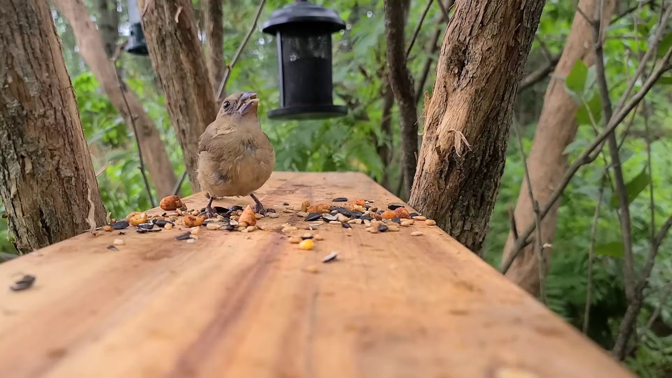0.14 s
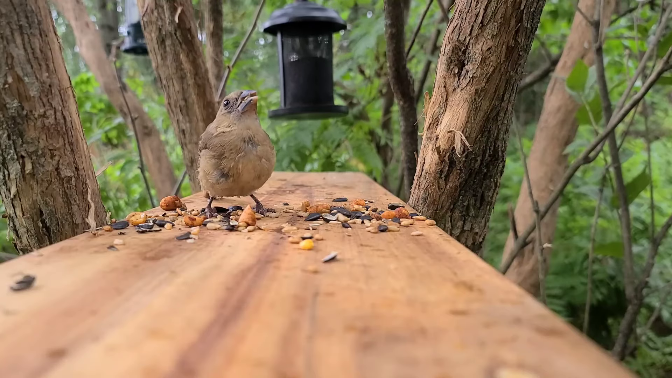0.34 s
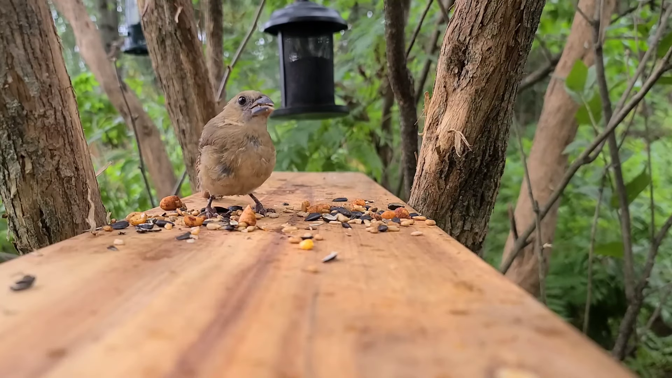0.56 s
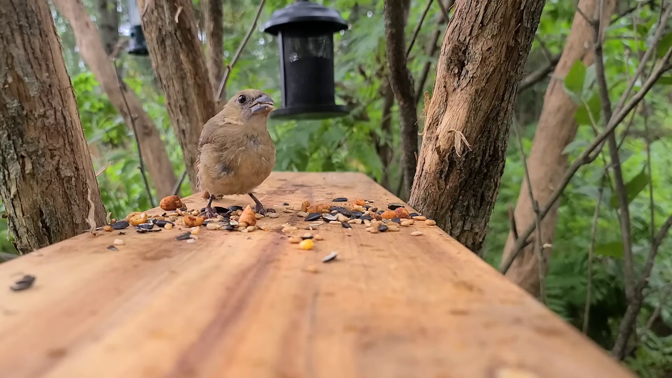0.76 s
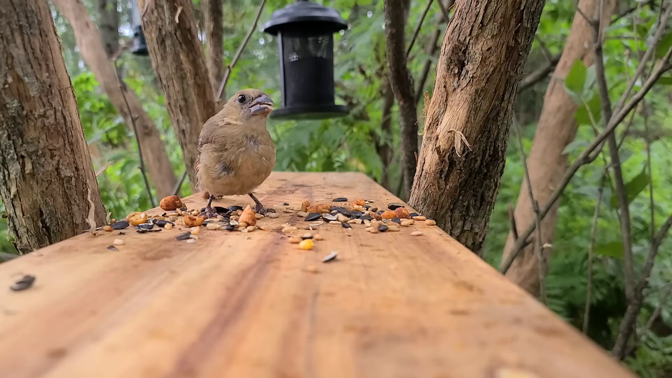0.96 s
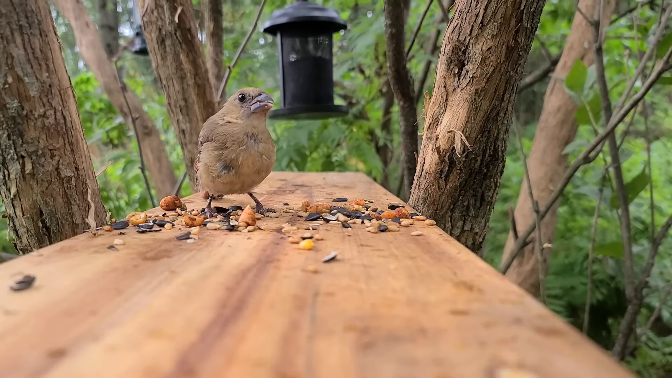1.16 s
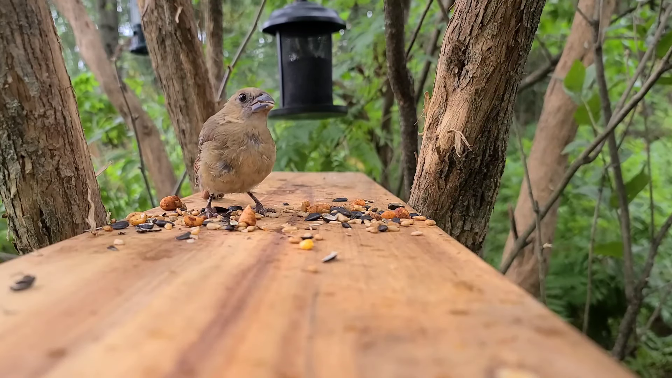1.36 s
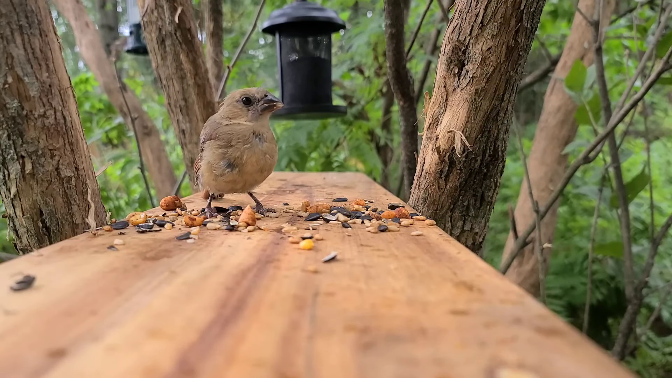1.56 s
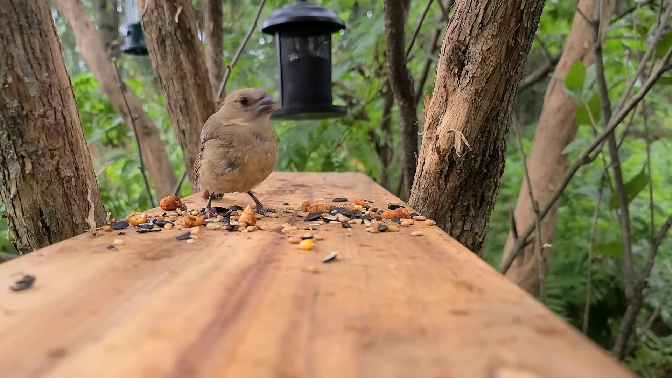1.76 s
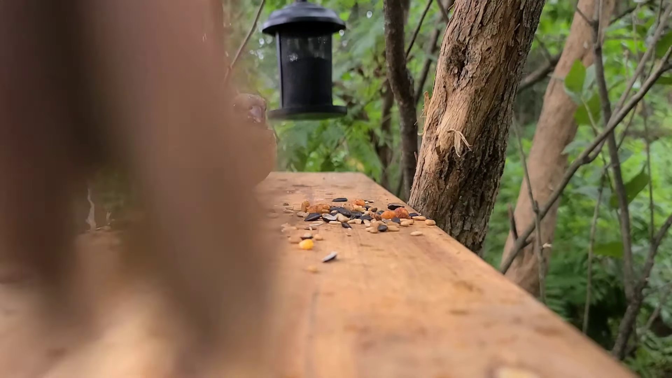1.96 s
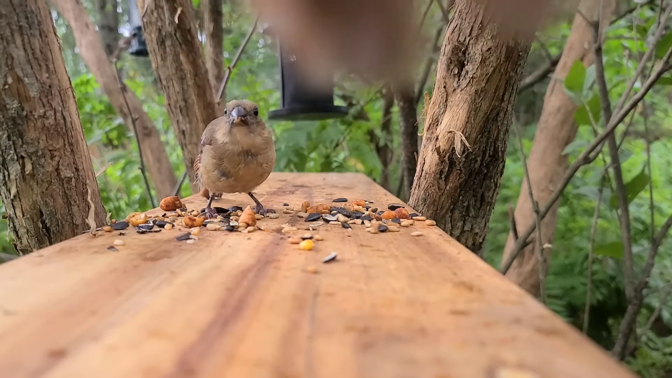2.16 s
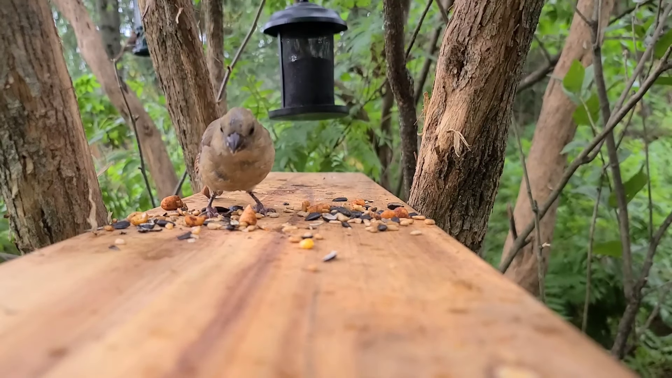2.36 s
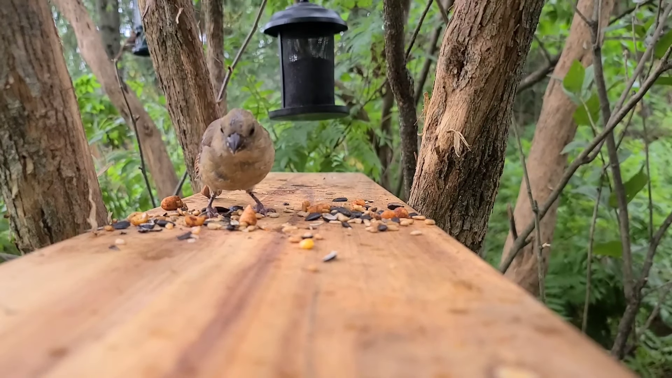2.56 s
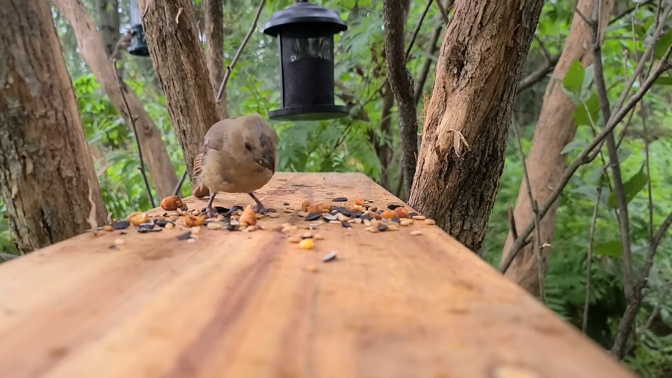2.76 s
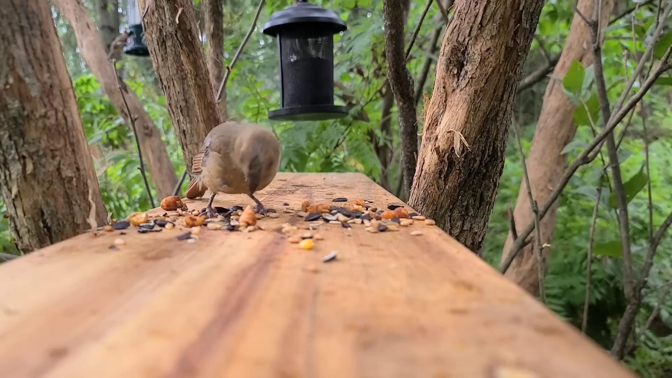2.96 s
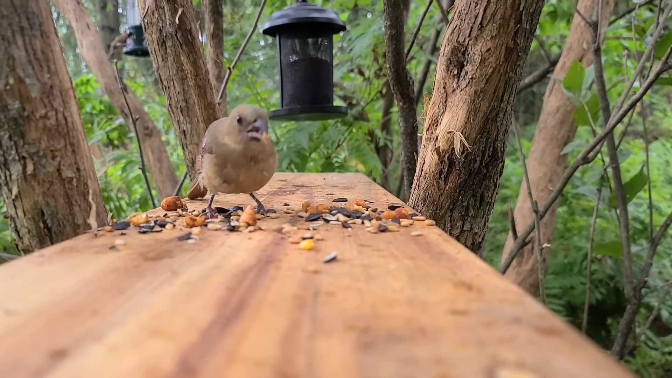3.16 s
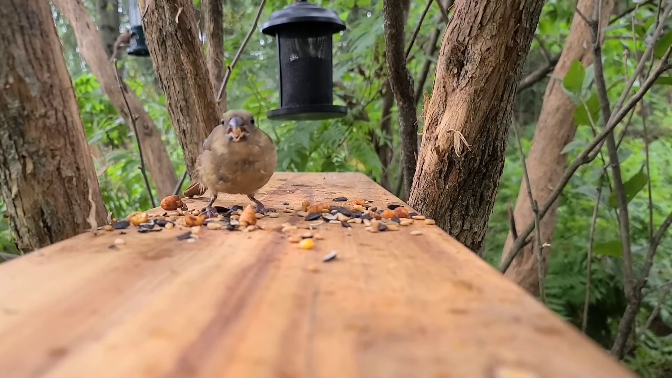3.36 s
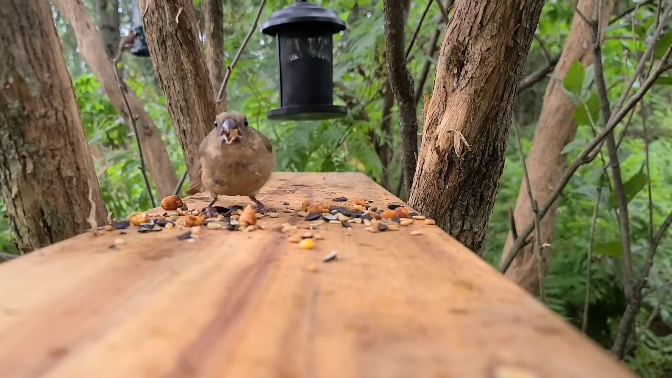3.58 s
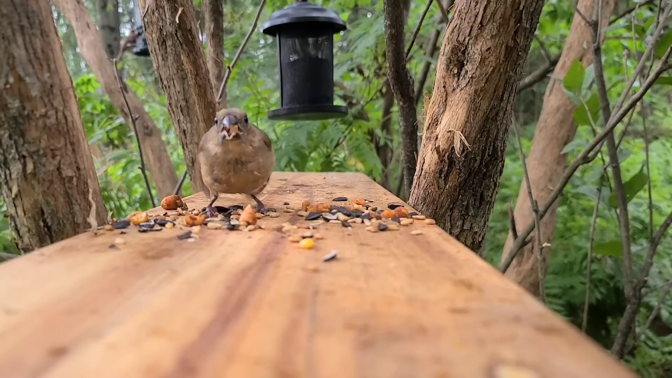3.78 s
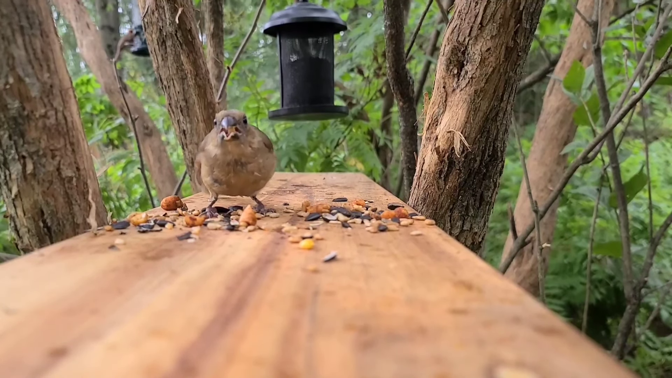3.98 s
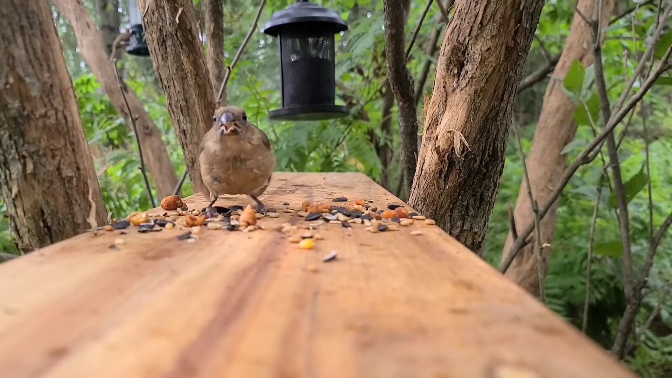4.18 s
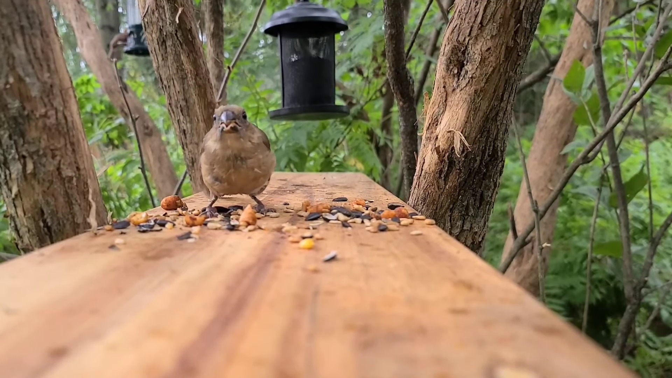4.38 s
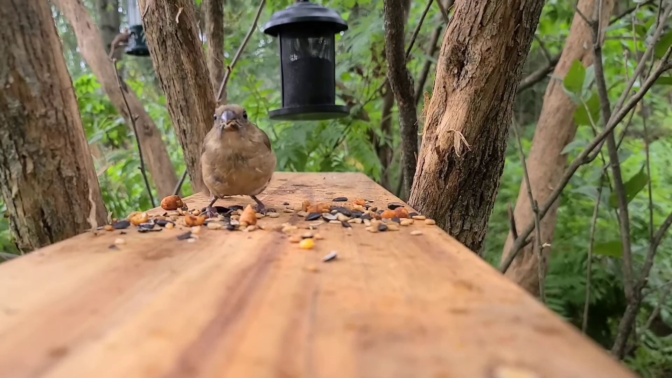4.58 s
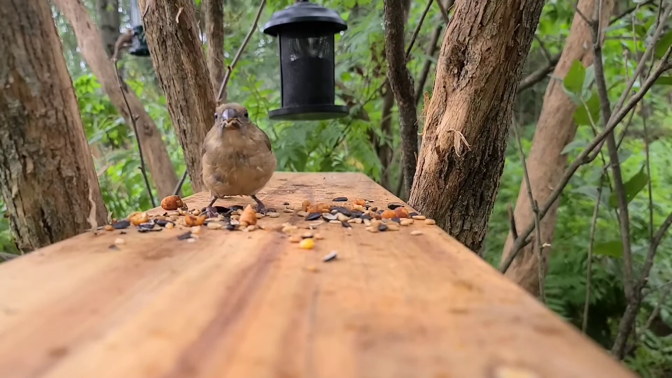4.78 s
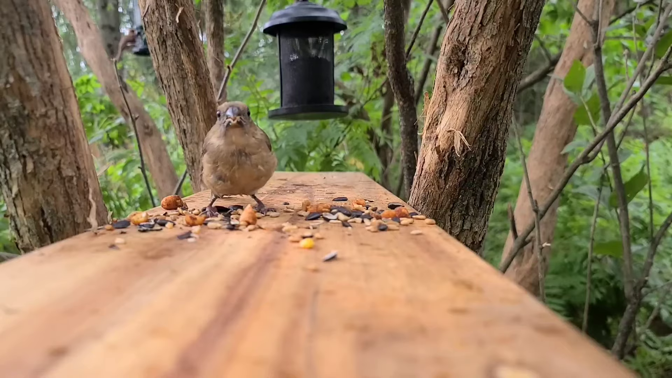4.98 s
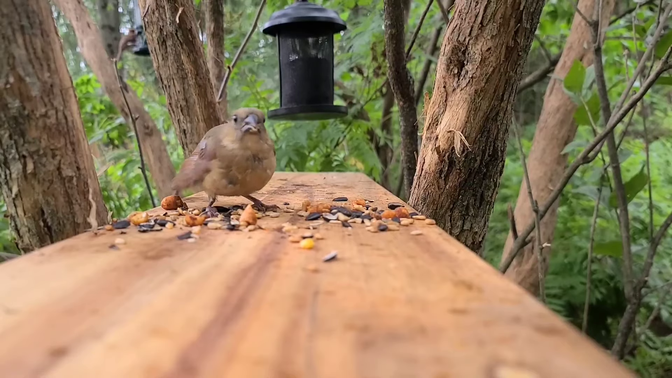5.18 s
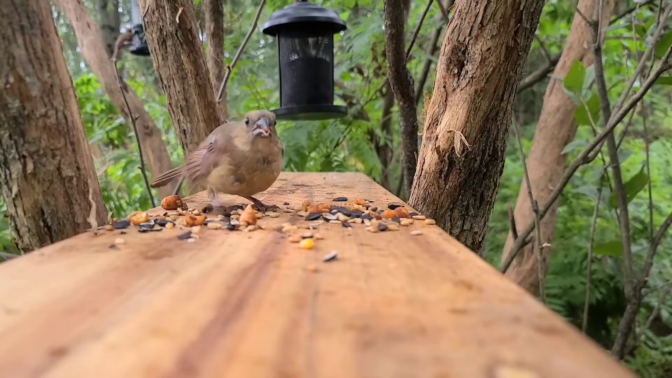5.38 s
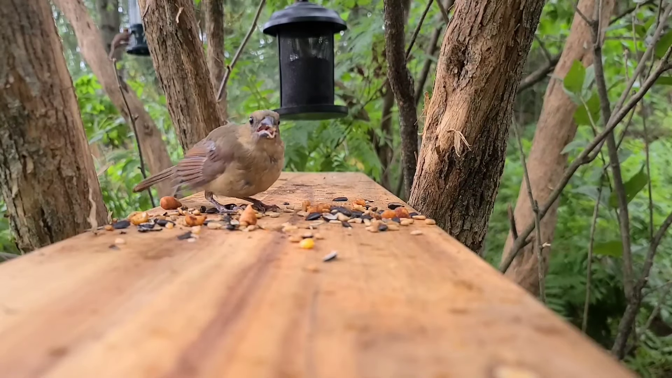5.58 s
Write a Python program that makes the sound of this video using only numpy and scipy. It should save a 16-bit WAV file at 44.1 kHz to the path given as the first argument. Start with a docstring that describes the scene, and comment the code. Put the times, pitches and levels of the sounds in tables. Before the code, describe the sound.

A small bird flutters close past the microphone, then taps and cracks seeds on a wooden board, with sharp chirps and faint distant birdsong.

```python
"""In a wooded backyard, a wooden bird feeder has a phone standing on its board. A low machine hum, a flickering
hiss and faint twig ticks (steady tones and shaped noise) lie behind. Whistles and nasal calls, made of sine
waves, come from the trees; three sharp chips sweep up, two nearby and one farther off. A bird flutters past the
microphone in pulses of air and a rush of noise. Claws and beak tap and scratch with short noise bursts, and
knock on the board, which rings as a set of fading sines."""
import sys
import numpy as np
from scipy import signal
from scipy.fft import rfft, irfft
from scipy.io import wavfile
from scipy.ndimage import uniform_filter1d

SR = 44100
rng = np.random.default_rng(int(sys.argv[2]) if len(sys.argv) > 2 else 0)


def dump(signal):
    """Clip the signal to [-1, 1] and save it as 16-bit WAV at the path in sys.argv[1]."""
    limited = np.clip(np.atleast_2d(signal).T, -1, 1)
    pcm = np.round(limited * 32767).astype(np.int16)
    wavfile.write(sys.argv[1], SR, pcm)


N = 248283
TIME = np.arange(N) / SR  # seconds

# Colour of the yard's noise. Each row: frequency in Hz, relative level in dB per Hz.
YARD_COLOUR = [(20, -8), (32, -18), (44, 0.5), (60, 2.5), (92, 1), (150, -8.5), (205, -14.5), (370, -13),
               (620, -20), (1400, -24.5), (2300, -31.5), (3400, -34), (9000, -45), (16000, -43.5)]
# How wide the yard's noise is. Each row: frequency in Hz, side minus mid in dB.
YARD_WIDTH = [(60, -16.5), (200, -12), (380, -9.5), (700, -2.5), (1300, -1.5), (4400, 1)]
# How the yard's noise leans. Each row: frequency in Hz, left minus right in dB.
YARD_LEAN = [(900, 0.5), (2000, -3), (4000, -2), (7000, -3.5), (10000, -0.5)]
YARD_DB = -42.5  # level before the leafy bands flicker

# Lines of the machine hum. Each row: frequency in Hz, level in dB, amount of waver (0 to 1).
HUM_LINES = [(62.7, -41, 1), (56.6, -56.5, 1), (112.44, -49, 0.03), (243, -65, 0.17), (297.6, -62, 0.05),
             (366, -66.5, 0.9)]

# Ticks of leaves and twigs: pitch range in Hz, sharpness of the ring (Q), decay in seconds.
TWIG_LOW_HZ, TWIG_HIGH_HZ, TWIG_Q, TWIG_S = 807, 2400, 3.6, 0.0067
# Loudest level at the lowest pitch, spread of levels, and farthest lean to either side, in dB.
TWIG_DB, TWIG_RANGE_DB, TWIG_PAN_DB = -54.5, 8, 8

# Thin whistles. Each row: start in seconds, length in seconds, first pitch in Hz, sag in Hz,
# level in dB before the echoes.
WHISTLE_NOTES = [(.21, .13, 7980, 420, -61), (.37, .04, 7620, 450, -60), (.49, .055, 7620, 450, -61),
                 (.58, .05, 7780, 380, -62), (.685, .045, 7600, 380, -62), (.81, .17, 7560, 170, -63),
                 (1.06, .11, 7380, 450, -62), (1.17, .07, 7000, 850, -68), (3.865, .11, 7650, 380, -59),
                 (3.96, .21, 7300, 380, -67.5), (4.56, .11, 7460, 320, -61.5), (4.71, .1, 7260, 60, -66),
                 (4.81, .11, 7220, 0, -61)]
SAG_S = .09  # time constant of the sinking pitch
WARBLE_HZ, WARBLE_RATE = 95, 450  # typical pitch wobble in Hz, changes per second

# Nasal calls from the trees. Each row: start in seconds, length in seconds, first and last pitch in Hz,
# level in dB before the echoes, swell over the call in dB, then the tilt in dB per overtone
# at the start, middle and end.
NASAL_NOTES = [(0.15, .11, 885, 845, -62, -6, 0, -2, -4), (.255, .155, 865, 825, -68, -2, -14, -20, -20),
               (1.125, 0.1, 850, 835, -63.5, 3, -5, -3, -3), (1.235, .125, 825, 795, -60.5, 3, 5, 1, 0),
               (4.6, .125, 838, 820, -58.5, 4, 5, -1, -5), (4.725, .13, 812, 778, -56.5, -1, -5, -1.5, -2),
               (5.29, 0.18, 872, 860, -67.5, 0, -1, -1, -1)]
# Overtones of the nasal calls. Each row: multiple of the pitch, level in dB before the tilt.
NASAL_OVERTONES = [(3, -9), (4, 0), (5, -21), (6, -7), (7, -23)]
STRONGEST_OVERTONE = 4  # the tilt turns around this multiple

# Chips, each one fast upward sweep. Each row: time in seconds of the steepest point, loudest point
# in seconds after that, level in dB, low pitch in Hz, top pitch in Hz, sweep time in seconds,
# attack in seconds, release in seconds, roughness (0 to 1), low note in dB, octave in dB, rasp in dB,
# scatter in dB, time in seconds for the scatter to fall by 60 dB.
CHIP_SWEEPS = [(0.5829, 0.00048, -27.5, 1400, 5860, 0.001, 0.0054, 0.0014, .2, 2, -16, -10, -10.5, 0.048),
               (1.496, -0.0064, -45.5, 5630, 8100, 0.00505, 0.0014, 0.016, 0.1, 3, -12, -28, -0.5, 0.19),
               (3.7525, 0.0013, -14.5, 1400, 7660, .0013, 0.0053, 0.0022, .16, -3, -8.5, -2.5, -10, 0.077)]

# Colour of air in the wing feathers. Each row: frequency in Hz, level in dB.
FEATHER_COLOUR = [(150, 2), (300, -0.5), (600, -2), (1500, -11), (4000, -19), (7000, -25), (12000, -17.5),
                  (16000, -20)]
RUSH_START_S, RUSH_END_S = 1.838, 2.022
RUSH_LEAD_S = 0.011  # the rush peaks this long before each push
RUSH_DB, RUSH_RISE_DB = -52, 18  # level at the start and rise to the end

WINGS_START_S, WINGBEAT_S, WINGBEATS = 1.892, .05, 3
WING_DB, WING_FADE_DB = -13, -1.5  # first stroke, change per stroke
WING_HZ, WING_HALF_S = 47.5, 0.01  # air push and its half length, both for the first stroke
WING_SLOWING = 0.92  # each stroke pushes more slowly than the last as the bird brakes
WING_WAKE_S = .003  # first-stroke shift: suction behind the push outweighs the one before it

# Longer scratches and rustles. Each row: start in seconds, length in seconds, body level in dB,
# treble level in dB, left minus right in dB, ring in Hz, sharpness of the ring (Q), top of the body in Hz.
SCRAPE_RUNS = [(1.959, 0.012, -31.5, -48, 11, 1150, 1.1, 2600),
               (1.972, 0.028, -40, -40, 6, 1400, 1.7, 6000), (1.998, 0.025, -43, -47, 3, 1600, 1.2, 4000),
               (2.093, .021, -33, -63, 12, 1730, 2.5, 2220),
               (2.110, 0.015, -34.5, -35, 1, 2800, 0.74, 7000),
               (2.123, 0.0082, -36, -28, -1, 1800, 1.0, 6000), (2.133, 0.022, -32, -58, -8, 3700, 4, 4570),
               (2.155, 0.0092, -34, -34.5, -6, 3600, 1.3, 4800),
               (2.165, 0.027, -44.5, -60, -1, 2800, 0.86, 5000),
               (2.222, .02, -56, -50.5, 1, 3500, 1.3, 7000), (2.299, .012, -44, -41, 0, 3000, 1.3, 7000),
               (2.348, 0.017, -44, -36.5, -6, 3000, 1.3, 7000),
               (2.705, 0.039, -76, -54.5, 0, 2500, 1.3, 7000),
               (3.181, 0.032, -43, -49, -8, 3300, 1.3, 5500), (3.215, 0.024, -37, -44, -6, 4000, 1.3, 7000),
               (3.223, .013, -30.5, -52, 11, 1600, 1.5, 4500),
               (3.256, 0.025, -43, -55, -6, 2190, 0.99, 7000), (3.284, .018, -47, -67, -6, 3000, 1.1, 5500),
               (5.135, 0.16, -60, -62.5, -1, 1090, 1.5, 5000),
               (5.406, 0.085, -60, -64.5, -1, 2500, 1.3, 7000)]
# Colour of the scrapes' treble. Each row: frequency in Hz, level in dB.
RUSTLE_COLOUR = [(3500, -9), (7000, -2), (9000, -2.5), (12000, -1), (15500, -3), (17000, -17)]
# Every contact drags a little before and after it bites.
DRAG_LEAD_S, DRAG_S, DRAG_Q = 0.0033, 0.014, 1.2
# The drag grows more slowly than the crack; its treble follows the snap.
DRAG_DB, DRAG_GROWTH, DRAG_TREBLE_DB = -26, 0.75, -26

# Ways the board rings. Each row: frequency in Hz before it varies by spot,
# time in seconds to fall by 60 dB, level in dB before it varies by spot and contact time.
BOARD_MODES = [(344, 0.032, 6.5), (406, 0.065, 4), (509, 0.015, 27), (683, 0.02, 18), (855, 0.0075, 0),
               (1220, .014, 1), (1700, 0.036, -16)]
REBOUND_S, REBOUND_DB, BOARD_PAN_DB = 0.0086, -13.5, 4  # every knock bounces once; left minus right

# Blows of beak and claw on the board. Each row: time in seconds, knock in dB, crack in dB, snap in dB,
# left minus right in dB, ring in Hz, sharpness of the ring (Q), top of the crack in Hz,
# contact time in seconds.
PECK_BLOWS = [(1.9555, -25.5, -16, -21, -14, 3300, 1.9, 5500, .001),
              (2.093, -29, -28, -58, 4, 2200, 1.2, 5000, .0004),
              (2.1028, -28, -28, -56, -3, 2600, 1.2, 4800, .0004),
              (2.122, -45, -21, -40, 0, 2000, 0.83, 6000, .0004),
              (2.1467, -20.5, -11.5, -22, 8.5, 3830, 3.5, 4660, 0.0014),
              (2.313, -50, -27.5, -46, 5, 1670, 2, 5500, .001),
              (2.3179, -51, -27, -34, 4, 1710, 1.3, 4000, .001),
              (2.3327, -15.5, -12, -25, 6, 1380, 0.81, 8000, 0.002),
              (2.3738, -19.5, -18.5, -26.5, -8, 3370, 0.85, 6050, .0005),
              (3.199, -31.5, -33, -43, -2, 3600, 2.4, 6000, .001),
              (3.209, -34, -31, -38, -4, 3600, 2.2, 6000, .001),
              (3.251, -10.5, -16, -31, 6, 3900, 0.89, 5500, 0.0025),
              (3.2608, -24, -21, -50, 5, 1320, 1.8, 3000, .003),
              (3.2628, -32, -24, -48, -7, 4800, 3.2, 6000, .002),
              (5.25, -52, -45.5, -60, -1, 3700, 2.3, 5550, .001)]
# Seed husks snapping, the smaller the brighter. Each row: time in seconds, level in dB,
# left minus right in dB, foot of the snap in Hz.
HUSK_SNAPS = [(1.9641, -24, 12, 3000), (1.9689, -25, 0, 3000), (1.9818, -16.5, -10, 10500),
              (1.9924, -19, 14, 12800), (2.0417, -32, 1, 3000), (2.1235, -21, 4, 3000),
              (2.142, -26, 11, 6000), (2.1585, -21, 8, 9100), (2.1858, -37, 5, 4000),
              (2.2352, -44, 1, 4000), (2.343, -25, 4, 7000), (2.371, -21.5, 6, 7000),
              (2.3908, -31.5, -8, 5000), (3.214, -9.5, 1, 2000), (3.2278, -17, 20, 4000),
              (3.264, -21, 4, 7500), (3.2745, -18.5, 0, 2000), (3.279, -19, -8, 2000)]
# Soft steps as the bird shifts its weight. Each row: time in seconds, knock in dB, crack in dB, ring in Hz.
STEP_TOUCHES = [(.484, -49, -44, 1100), (.7365, -43, -43, 1040), (0.8888, -42, -43, 1400),
                (1.536, -44, -38.5, 1300), (2.746, -48, -42.5, 950), (3.277, -28, -29, 900),
                (3.335, -35, -47, 900), (3.359, -30, -37, 850), (3.373, -31, -49, 850),
                (3.549, -44, -39.5, 945), (3.712, -48, -48, 850), (3.758, -24, -29, 850),
                (3.769, -27.5, -31, 850), (4.103, -37, -43, 1200), (4.882, -48, -41.5, 1310),
                (5.162, -34, -34, 1000), (5.174, -37.5, -43, 1050)]
# Colour of the woody body of a contact. Each row: frequency in Hz, level in dB.
BODY_COLOUR = [(500, -13.5), (1200, 7), (1750, 3.5), (2400, -2), (3400, -1), (4400, -2), (5400, -6.5),
               (7000, -1), (12000, -54)]
# Colour of the bright snap of a contact. Each row: frequency in Hz, level in dB.
SNAP_COLOUR = [(3000, -8), (5500, -6), (7300, -14), (8800, -2), (10200, -8), (11800, -2), (13000, -12),
               (15300, -6), (17000, -29)]
HUSK_Q, STEP_Q = 5.4, 3.6  # sharpness of the ring
HUSK_BODY_DB, HUSK_HZ = -12, 3200  # body of a husk, under its snap
STEP_SNAP_DB, STEP_PAN_DB, STEP_CONTACT_S = -21, 6, 0.00033  # a step is dull: its snap is far below its crack
BODY_TOP_HZ, SNAP_FOOT_HZ = 7600, 2500  # usual upper edge of a body and lower edge of a snap
PECK_RING_S, HUSK_RING_S, STEP_RING_S = 0.0011, 0.00063, 0.0059  # decay of each body
CRACK_S = .0013  # length over which a crack's level is set

TOP_HZ = 15900  # upper limit of the phone's sound


def undb(db):
    """Turn decibels into gain."""
    return 10 ** (np.asarray(db) / 20)


def unit(x):
    """Scale to an rms (average strength) of 1."""
    return x / np.sqrt(np.mean(x ** 2))


def pan(db):
    """Give left and right gains for a level difference."""
    return unit(undb(np.array([[db], [-db]]) / 2))


def spectrum(points):
    """Read a table of Hz and dB at every frequency bin."""
    hz, db = np.transpose(points)
    bins_hz = np.arange(N // 2 + 1) * SR / N
    return np.interp(np.log(bins_hz + 1), np.log(hz), db)


def colour(x, points):
    """Filter by a table of Hz and dB, keeping the power of white noise."""
    return irfft(rfft(x) * unit(undb(spectrum(points))), N)


def walk(rate):
    """Drift smoothly by chance with spread 1, changing about rate times a second."""
    k = max(int(SR / rate), 2)
    steps = np.repeat(rng.standard_normal(N // k + 1), k)
    smooth = uniform_filter1d(uniform_filter1d(steps, k), k)
    return unit(smooth[:N])


def add(out, s, sound):
    """Mix a stereo sound in at time s."""
    i = int(s * SR)
    out[:, i:i + sound.shape[1]] += sound[:, :N - i]


def edge(x, hz, kind):
    """Cut steeply: "low" keeps what is below hz, "high" what is above."""
    return signal.sosfilt(signal.butter(4, min(hz, .45 * SR), kind, fs=SR, output="sos"), x)


def resonate(x, hz, q, top_hz):
    """Ring broadly like the seed or claw that is touched, dull above its top."""
    ringing = signal.lfilter(*signal.iirpeak(hz, max(q, .6), fs=SR), x)
    return edge(ringing, top_hz, "low")


def echoes(x, t60, wet_db, dry_db=0):
    """Add a fading, diffuse scatter, different in each channel; t60 is its time to fall by 60 dB."""
    t = TIME[:SR // 2]
    tail = rng.standard_normal((2, len(t))) * np.exp(-np.log(1000) * t / t60)
    tail /= np.sqrt(np.sum(tail ** 2) / 2)
    scatter = signal.fftconvolve(x, tail, axes=1)[:, :N]
    return x * undb(dry_db) + undb(wet_db) * scatter


def contact_noise(points, shared):
    """Make noise with a given colour, partly common to both channels."""
    noise = rng.standard_normal((2, N)) + shared * rng.standard_normal(N)
    return unit(colour(noise, points))


def contacts():
    """List every peck, husk and step with the same settings, in the order taps() reads them."""
    pecks = [(s, crack_db, snap_db, pan_db, hz, q, PECK_RING_S, top_hz, SNAP_FOOT_HZ)
             for s, _, crack_db, snap_db, pan_db, hz, q, top_hz, _ in PECK_BLOWS]
    husks = [(s, db + HUSK_BODY_DB, db, pan_db, HUSK_HZ, HUSK_Q, HUSK_RING_S, BODY_TOP_HZ, foot_hz)
             for s, db, pan_db, foot_hz in HUSK_SNAPS]
    steps = [(s, db, db + STEP_SNAP_DB, STEP_PAN_DB, hz, STEP_Q, STEP_RING_S, BODY_TOP_HZ, SNAP_FOOT_HZ)
             for s, _, db, hz in STEP_TOUCHES]
    return pecks + husks + steps


def yard(flicker_rate=35):
    """Rumble common to both channels under a wide hiss; the leafy middle range flickers band by band."""
    mid, side = rng.standard_normal((2, N))
    side = irfft(rfft(side) * undb(spectrum(YARD_WIDTH)), N)
    lean = undb(np.array([[1], [-1]]) * spectrum(YARD_LEAN) / 2)
    stereo = irfft(rfft(np.array([mid + side, mid - side])) * lean, N)
    air = unit(colour(stereo, YARD_COLOUR)) * undb(YARD_DB)
    out, shared = air, walk(flicker_rate)
    for hz in (400, 800, 1600, 3200):
        octave_band = signal.butter(2, [hz, 2 * hz], "band", fs=SR, output="sos")
        leaves = signal.sosfiltfilt(octave_band, air)
        out = out + leaves * (undb(shared + walk(flicker_rate)) - 1)
    return out


def hum(waver_rate=9):
    """Low lines of a distant machine, wavering in level and phase."""
    out = 0
    for hz, db, waver in HUM_LINES:
        drift = 1 + waver * (walk(waver_rate) + 1j * walk(waver_rate))
        line = np.real(drift * np.exp(2j * np.pi * hz * TIME))
        out = out + undb(db) * unit(line)
    return out


def twigs(count=80):
    """Faint ticks and rustles of leaves and twigs all around, each with its own pitch and place."""
    out, t = np.zeros((2, N)), TIME[:SR // 25]
    for when, pitch, size, place in rng.random((count, 4)):
        hz = TWIG_LOW_HZ * (TWIG_HIGH_HZ / TWIG_LOW_HZ) ** pitch
        burst = rng.standard_normal(len(t)) * np.exp(-t / TWIG_S)
        tick = unit(resonate(burst, hz, TWIG_Q, 2 * hz))
        level = undb(TWIG_DB - TWIG_RANGE_DB * size) * TWIG_LOW_HZ / hz  # higher ticks are softer
        add(out, when * N / SR, tick * level * pan(TWIG_PAN_DB * (2 * place - 1)))
    return out


def whistles(flutter_db=3.0, pan_db=-5):
    """Thin whistles that sink and settle, blurred by a fast warble."""
    out, warble, flutter = np.zeros((2, N)), walk(WARBLE_RATE), undb(flutter_db * walk(42))
    for s, length, first_hz, sag_hz, db in WHISTLE_NOTES:
        on = (TIME > s) & (TIME < s + length)
        t = TIME[on] - s
        hz = first_hz - sag_hz * (1 - np.exp(-t / SAG_S)) + WARBLE_HZ * warble[on]
        phase = 2 * np.pi * np.cumsum(hz) / SR
        swell = np.sin(np.pi * t / length) ** 0.34
        out[:, on] += unit(swell * np.sin(phase) * flutter[on]) * undb(db) * pan(pan_db)
    return out


def nasal_calls(jitter=0.006, fade_db=3.0, fade_rate=45, pan_db=3):
    """A far bird's reedy note droops at the end; its loudness drifts and its brightness shifts with the beak."""
    out, waver = np.zeros((2, N)), walk(60)
    for s, length, first_hz, last_hz, db, swell_db, *tilts in NASAL_NOTES:
        on = (TIME > s) & (TIME < s + length)
        u = (TIME[on] - s) / length  # 0 to 1 through the call
        hz = (first_hz + (last_hz - first_hz) * u ** 2) * (1 + jitter * waver[on])
        phase = 2 * np.pi * np.cumsum(hz) / SR
        tilt_db = np.interp(u, (0, .5, 1), tilts)
        voice = 0
        for k, part_db in NASAL_OVERTONES:
            overtone_db = part_db + tilt_db * (k - STRONGEST_OVERTONE) + fade_db * walk(fade_rate)[on]
            voice = voice + undb(overtone_db) * np.sin(k * phase)
        swell = np.sin(np.pi * u) ** 0.099 * undb(swell_db * u)
        out[:, on] += unit(swell * voice) * undb(db) * pan(pan_db)
    return out


def chips(third_db=-21, rasp_hz=5600, hiss_db=-8, clearing=0.81, pan_db=-6):
    """A raspy low note with two overtones swells, clears as it shoots up to a high one and dies away."""
    out, waver = np.zeros((2, N)), walk(2500)
    rasp = unit(resonate(contact_noise(BODY_COLOUR, shared=1.0), rasp_hz, q=0.76, top_hz=BODY_TOP_HZ))
    rasp = rasp + undb(hiss_db) * contact_noise(SNAP_COLOUR, shared=0.24)
    for (s, crest_s, db, low_hz, top_hz, sweep_s, attack_s, release_s,
         rough, low_db, octave_db, rasp_db, wet_db, t60) in CHIP_SWEEPS:
        t = TIME - s
        low = (1 - np.tanh(t / sweep_s / 2)) / 2  # 1 on the low note, 0 at the top
        roughness = rough * (1 - clearing * (1 - low))
        hz = (top_hz + (low_hz - top_hz) * low) * (1 + roughness * waver)
        phase = 2 * np.pi * np.cumsum(hz) / SR
        tone = 0
        for k, part_db in enumerate((0, octave_db, third_db), 1):
            tone = tone + undb(part_db) * np.sin(k * phase) * (k * hz < SR / 2)
        away = np.maximum((crest_s - t) / attack_s, (t - crest_s) / release_s)
        swell = np.exp(-np.minimum(away, 20))
        voice = np.sqrt(2) * tone * undb(low_db * low) + low * undb(rasp_db) * rasp
        out += echoes(voice * swell * undb(db) * pan(pan_db), t60, wet_db)
    return out


def feathers(pulse_db=2.5, pan_db=0):
    """Air rushes through the wing feathers, in a puff before each push, and swells as the bird comes near."""
    u = np.clip((TIME - RUSH_START_S) / (RUSH_END_S - RUSH_START_S), 0, 1)
    stroke = np.cos(2 * np.pi * (TIME - WINGS_START_S + RUSH_LEAD_S) / WINGBEAT_S)
    fade_in_out = np.sqrt(np.minimum(10 * u * (1 - u), 1))
    swell = undb(RUSH_DB + RUSH_RISE_DB * u + pulse_db * stroke) * fade_in_out
    return swell * contact_noise(FEATHER_COLOUR, shared=0.94) * pan(pan_db)


def wings(sharpness=0.2, pan_db=-2.5):
    """Each stroke sucks, pushes and sucks the air at the microphone; the push is the sharper part."""
    air = 0
    for k in range(WINGBEATS):
        t = (TIME - WINGS_START_S - k * WINGBEAT_S) * WING_SLOWING ** k
        turn = 2 * np.pi * WING_HZ * t
        push = (np.cos(turn) + sharpness * np.cos(2 * turn)) / (1 + sharpness)
        swell = np.exp(-((t - WING_WAKE_S) / WING_HALF_S) ** 2 / 2)
        air = air + undb(WING_DB + k * WING_FADE_DB) * push * swell
    return air * pan(pan_db)


def scrapes(grain_db=1.0, grain_rate=1100, slip_db=4.5, slip_rate=220):
    """Claws, husks and feathers catch and slip in a dense run of tiny grains."""
    out = np.zeros((2, N))
    body = contact_noise(BODY_COLOUR, shared=0.17)
    treble = contact_noise(RUSTLE_COLOUR, shared=0.18)
    grains = undb(grain_db * walk(grain_rate) + slip_db * walk(slip_rate))
    drags = [(s - DRAG_LEAD_S, DRAG_S, DRAG_DB + DRAG_GROWTH * body_db, snap_db + DRAG_TREBLE_DB,
              pan_db, hz, DRAG_Q, top_hz)
             for s, body_db, snap_db, pan_db, hz, _, _, top_hz, _ in contacts()]
    for s, length, body_db, treble_db, pan_db, hz, q, top_hz in list(SCRAPE_RUNS) + drags:
        on = np.flatnonzero((TIME > s) & (TIME < s + length))
        force = grains[on] * np.sin(np.pi * (TIME[on] - s) / length) ** 0.5
        woody = undb(body_db) * unit(resonate(force * body[:, on], hz, q, top_hz))
        bright = undb(treble_db) * unit(force * treble[:, on])
        out[:, on] += (woody + bright) * pan(pan_db)
    return out


def knocks(push_s=0.00089, lag_s=0.0003, delay_s=0.00017):
    """A blow pushes the board and rebounds; longer contact rings deeper, and the left port hears it first."""
    out = np.zeros((2, N))
    t = np.maximum(TIME[:SR // 10] - np.array([[0], [lag_s]]), 0)
    blows = [(s, db, contact_s) for s, db, *_, contact_s in PECK_BLOWS]
    blows += [(s, db, STEP_CONTACT_S) for s, db, *_ in STEP_TOUCHES]
    rebounds = [(s + REBOUND_S, db + REBOUND_DB, contact_s) for s, db, contact_s in blows]
    for s, db, contact_s in blows + rebounds:
        spot = rng.standard_normal((len(BOARD_MODES), 2))  # every spot rings a little differently
        ring = 0
        for (hz, t60, mode_db), (level_shift, pitch_shift) in zip(BOARD_MODES, spot):
            strength = undb(mode_db + 2 * level_shift) / (1 + (hz * contact_s) ** 2)
            tone = np.sin(2 * np.pi * hz * (1 + pitch_shift / 20) * t)
            ring = ring + strength * tone * np.exp(-np.log(1000) * t / t60)
        ring = ring * (1 - np.exp(-t / push_s))
        add(out, s + delay_s, ring / np.abs(ring).max() * undb(db) * pan(BOARD_PAN_DB))
    return out


def taps(snap_s=0.00049, rise_s=0.00022):
    """Each tap is a short crack of two noise bursts: a woody body and a bright snap."""
    out, t = np.zeros((2, N)), TIME[:SR // 80]
    body = contact_noise(BODY_COLOUR, shared=0.32)
    snap = contact_noise(SNAP_COLOUR, shared=0.7)
    for s, body_db, snap_db, pan_db, hz, q, body_s, top_hz, foot_hz in contacts():
        span = int(s * SR) + np.arange(len(t))
        woody = resonate(body[:, span], hz, q, top_hz)
        bright = edge(snap[:, span], foot_hz, "high")
        for noise, decay, db in ((woody, body_s, body_db), (bright, snap_s, snap_db)):
            crack = noise * (1 - np.exp(-t / rise_s)) * np.exp(-t / decay)
            crack /= np.sqrt(np.sum(crack ** 2, axis=1, keepdims=True) / (CRACK_S * SR))
            add(out, s, crack * undb(db) * pan(pan_db))
    return out


def scene():
    """Sounds on the board are nearly dry; the trees scatter the far birds more."""
    background = yard() + hum() + twigs()
    far_birds = echoes(whistles() + nasal_calls(), t60=.25, wet_db=-5, dry_db=-1)
    flight = feathers() + wings()
    board = echoes(scrapes() + knocks() + taps(), t60=0.08, wet_db=-15.0)
    return background + far_birds + chips() + flight + board


def record(dry):
    """The phone rounds the highest peaks and cuts the top."""
    rounded = np.tanh(dry)
    return signal.sosfilt(signal.ellip(10, .2, 70, TOP_HZ, fs=SR, output="sos"), rounded)


dry = scene()
out = record(dry)
dump(out)
```